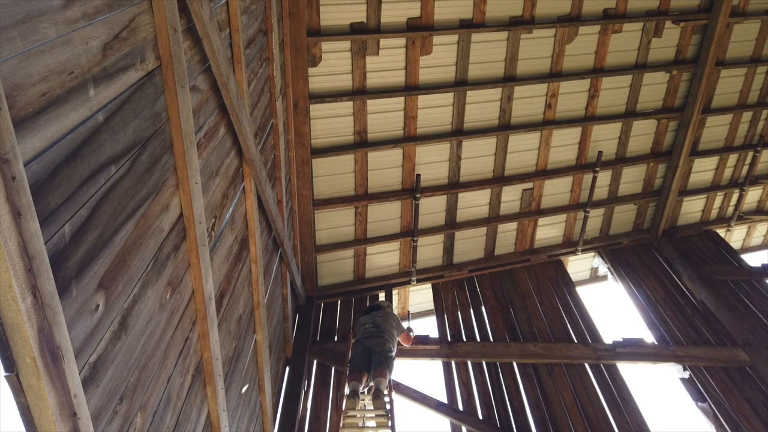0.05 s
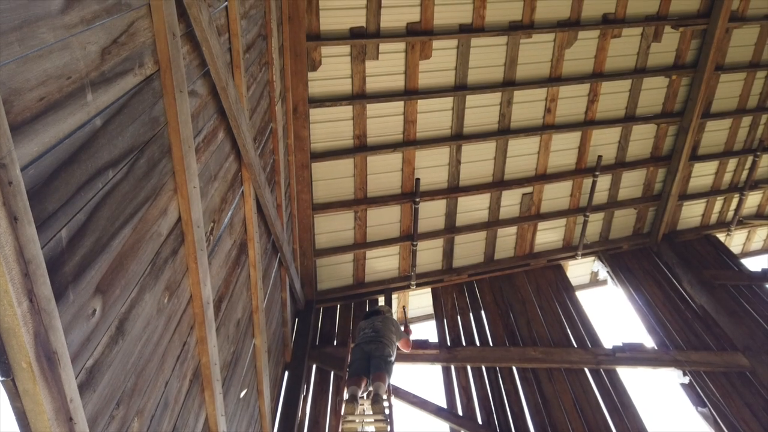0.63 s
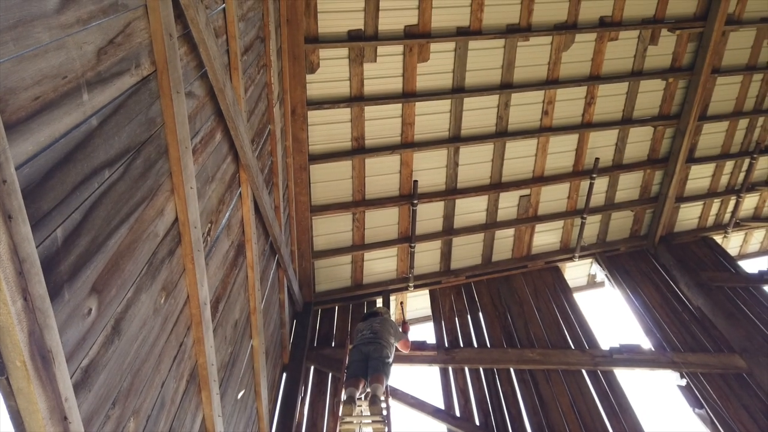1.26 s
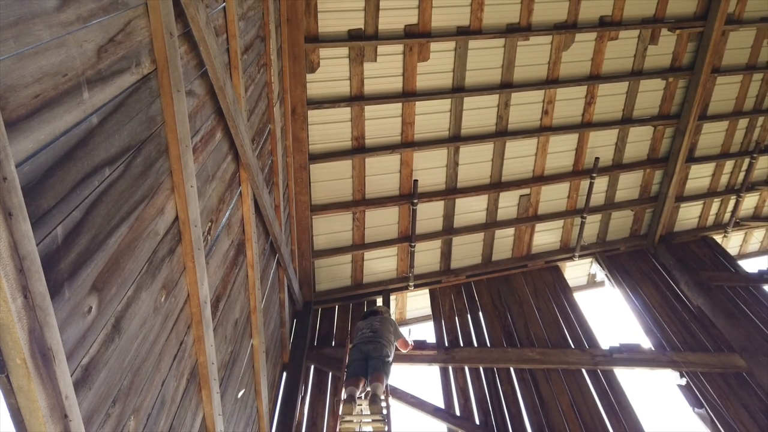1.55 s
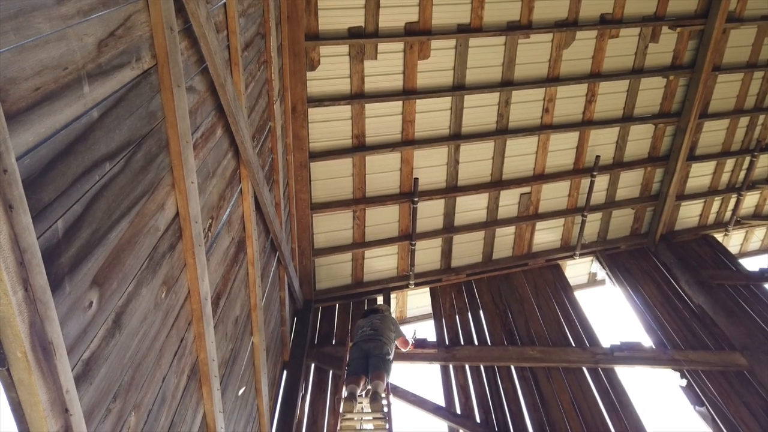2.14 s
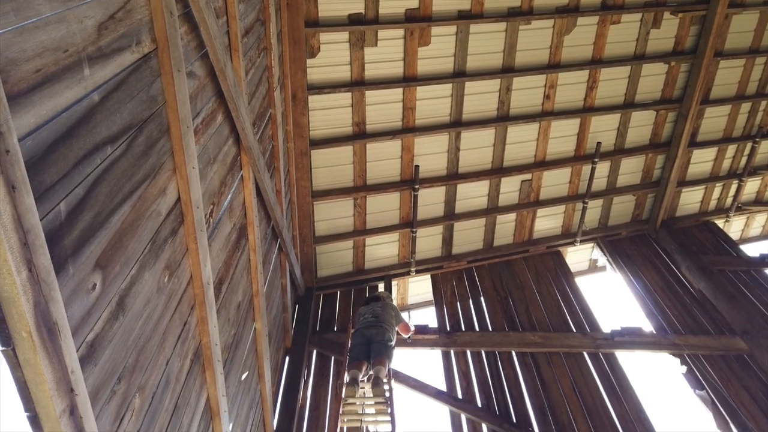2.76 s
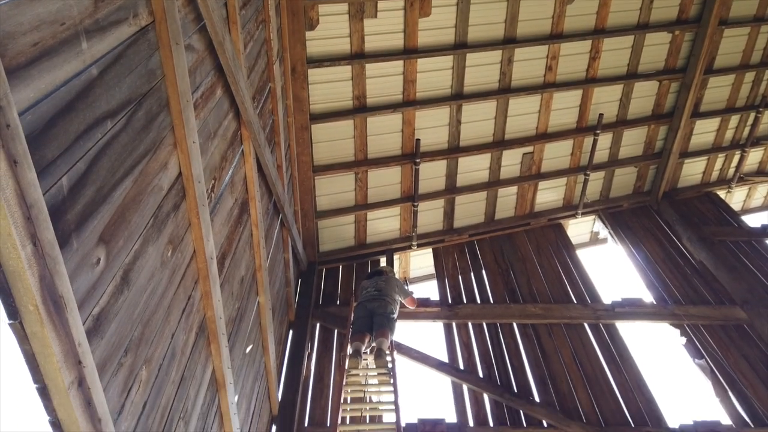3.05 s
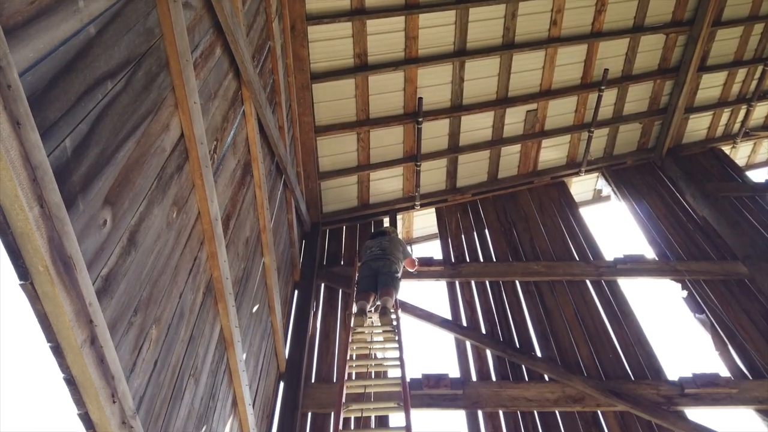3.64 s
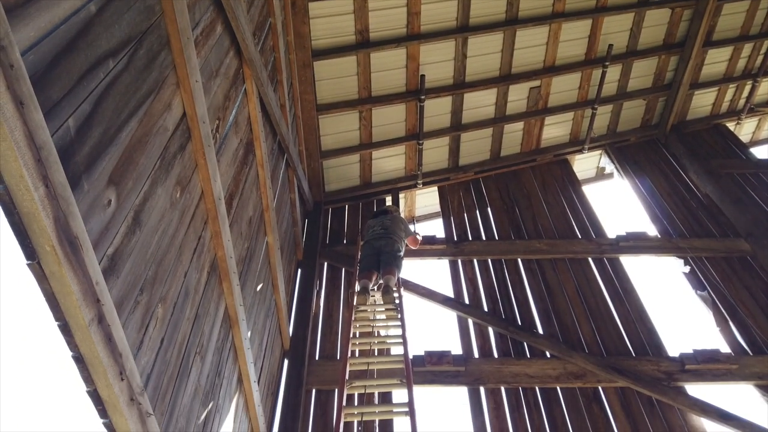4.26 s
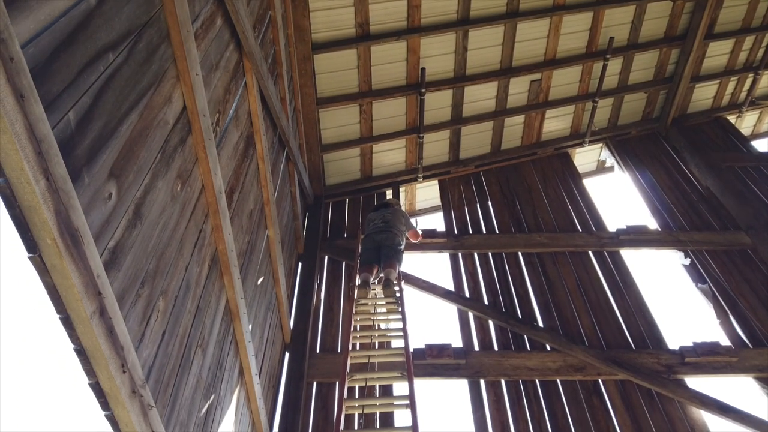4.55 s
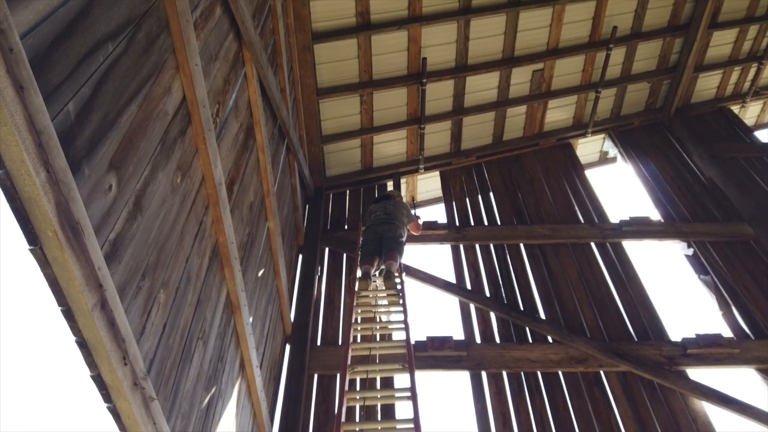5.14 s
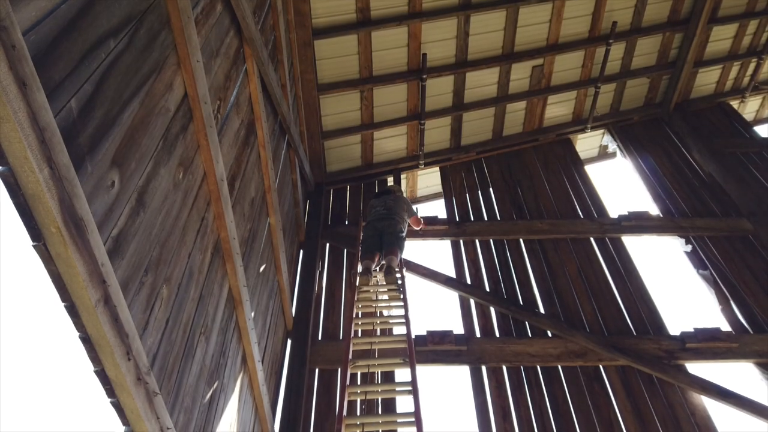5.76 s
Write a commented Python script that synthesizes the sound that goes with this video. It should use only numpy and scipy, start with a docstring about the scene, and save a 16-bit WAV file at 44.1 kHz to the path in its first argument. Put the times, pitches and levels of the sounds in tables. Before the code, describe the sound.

Two runs of ringing wooden knocks from someone climbing a ladder echo through a barn, with faint squeaks between.

```python
"""Wooden knocks from someone high on a tall ladder in a large timber barn: five knocks, a pause,
five quicker ones and the start of another. Each knock hits twice in quick succession, makes the same
woodwork ring and leaves a thin high ring behind. The plank walls and the roof throw the sound back.
In between come a few very faint thin squeaks and two soft bumps.
Under it all, a draught rumbles low and unevenly, with a little hiss."""
import sys
import numpy as np
from scipy import signal
from scipy.fft import rfft, irfft, next_fast_len
from scipy.io import wavfile
from scipy.ndimage import uniform_filter1d

SR = 44100
rng = np.random.default_rng(int(sys.argv[2]) if len(sys.argv) > 2 else 0)


def output_pcm(signal):
    """Save a mono or channel-first signal as 16-bit PCM at the path in sys.argv[1].

    Samples are clipped to [-1, 1] before scaling.
    """
    pcm = np.clip(np.atleast_2d(signal).T, -1, 1) * 32767
    wavfile.write(sys.argv[1], SR, np.round(pcm).astype(np.int16))


N = 264591
RING_SAMPLES = 49152  # room for one sound to die away

# one row per knock: (time [s], strength [dB], bass boost [dB], treble boost [dB], second hit delay [s],
# second hit level [dB], note of the struck spot [Hz], boost of that note [dB], high ring level [dB])
KNOCKS = [(0.0925, -4.5, 0.4, 4.5, 0.018, 2.5, 2060, 3, -58),
          (0.5748, -1.64, 2, 6, 0.0082, -2, 1700, 2, -68),
          (1.1077, -2.5, 1.5, 5.5, 0.0076, 0, 1610, 1.5, -60),
          (1.6699, 0.07, -1.2, 3.5, 0.025, -3.5, 1170, 2, -48),
          (2.28, 1.7, -7.5, 0.4, 0.021, 0, 1055, 4, -37), (3.8948, 5.5, -8, -6, .007, -8, 1676, 2, -47),
          (4.3085, 0.4, -0.3, -4, .015, 1, 3120, 4, -53), (4.7193, -4, -0.5, 4, .020, 2.5, 1210, -2, -44.5),
          (5.136, -3, -1, 3.5, .015, 3, 1100, -3, -44), (5.5592, -0.8, 0, 1, 0.013, 2, 645, -4, -44),
          (5.9968, -1.5, 8.5, 13.5, .015, 0, 1100, -11, -47)]
# notes at which the woodwork rings: (pitch [Hz], boost [dB])
WOOD_NOTES = [(88, 9), (113, 10.5), (132, 7), (166, 9), (205, 10), (236, 11.5), (293, 9.5), (368, 7.5),
              (414, -0.5), (457, 2.5), (506, 3), (600, 6.5), (622, 2), (707, 4.5), (837, -1.5), (899, 6),
              (990, 5.5), (1087, 6), (1122, 6.5), (1211, 7.5), (1313, 5), (1528, -1.5), (1625, 4.5),
              (1870, -2.5), (2010, 2), (2169, 7), (2387, 6), (2511, 5), (2831, 0), (3150, 2)]
# overall tone of a knock: (frequency [Hz], level [dB])
KNOCK_TONE = [(30, -21), (70, 0), (100, 4.5), (200, 2.5), (400, 0), (620, -0.5), (1100, -4.5), (1700, -4),
              (2600, -12), (3200, -11.5), (3700, -17), (6500, -20), (9000, -27), (11000, -25.5),
              (15500, -41)]
# how closely each knock follows the usual paths through the barn: (frequency [Hz], likeness [0 to 1])
PATH_LIKENESS = [(100, 0.87), (600, 0.99), (2000, 1), (5000, 0.29), (12000, 0.5)]
# notes of the thin high ring: (pitch [Hz], level [dB], time to fade by 60 dB [s])
HIGH_NOTES = [(2780, -3, .5), (2980, -1, .6), (3150, 0, .38), (3310, -2, .38), (4200, -9, .45),
              (4700, -4, .58), (5450, -11, .5)]
# the barn's echo, band by band: (frequency [Hz], time to fade by 60 dB [s], build-up time [s],
# early echoes compared with the tail [dB], direct sound compared with the tail [dB])
BARN_BANDS = [(51.3, 0.65, 0.027, -13, -9), (103, 1.07, 0.046, 3, 3), (214, 0.71, 0.0091, 6, 3),
              (450, 0.53, 0.01, 4.5, 8), (1058, 0.5, 0.016, 11, 10.5), (2530, 0.43, 0.012, -1, -0.5),
              (5000, 0.39, 0.018, 1.5, 4), (9300, 0.26, 0.024, -4, -4), (15000, 0.29, 0.0095, -6, 8)]
# how alike left and right sound: (frequency [Hz], likeness [0 to 1])
STEREO_LIKENESS = [(25, 0.62), (60, 0.46), (125, 0.97), (300, 0.99), (650, 0.96), (1200, 0.89), (1900, 0.9),
                   (2300, 0.34), (3000, 0.6), (4200, 0.21), (5200, 0), (16000, 0.096)]
# faint squeaks: (middle time [s], length [s], pitch [Hz], level [dB])
SQUEAKS = [(1.06, .15, 1750, -69), (2.03, .25, 1750, -64), (2.88, .14, 2260, -77), (3.16, .16, 1745, -66),
           (3.24, .3, 2780, -73), (3.42, .22, 990, -72), (3.44, .26, 1725, -61), (3.71, .14, 2760, -76),
           (3.72, .16, 1745, -75), (3.75, .1, 990, -73), (3.86, .14, 1745, -63)]
# soft bumps: (middle time [s], rough length [s], level [dB])
BUMPS = [(2.102, 0.22, -41.5), (3.437, .17, -34.5)]
# tone of the bumps: (frequency [Hz], level [dB])
BUMP_TONE = [(15, -8), (35, 0.5), (75, 2), (130, -10), (220, -14.5), (450, -35.5), (900, -51),
             (3000, -81.5)]
# how the draught swells and sinks: (time [s], relative level [dB])
DRAUGHT_LEVELS = [(0.0, -35.5), (0.57, -45.5), (0.75, -37), (0.92, -46), (2.57, -38), (2.89, -51.5),
                  (3.81, -46), (3.91, -43.5), (4.36, -50), (4.5, -41), (5.46, -40), (6.0, -42.5)]
# tone of the draught's rumble: (frequency [Hz], level [dB])
RUMBLE_TONE = [(10, -12), (25, 1), (45, -3), (80, -2.5), (120, -10), (200, -21), (300, -28), (450, -39.5),
               (800, -50), (2000, -52), (6000, -93)]
# how loud the hiss is: (time [s], level [dB])
HISS_LEVELS = [(0, -65.5), (2.9, -75), (3.7, -70), (6, -64.5)]
# tone of the hiss: (frequency [Hz], level [dB])
HISS_TONE = [(100, -16), (700, 2.5), (1500, 5.5), (2500, -0.5), (4500, -8), (6600, -11.5), (7400, -12.5),
             (8200, -1), (9200, -10.5), (12500, -10.5), (16000, -52)]


def knocks(level_db=23.5, bass_hz=250, treble_hz=4000, thin_below_hz=350, spot_width=0.39, ripple_db=2.2):
    """Each knock lands, then meets the wood a second time without the weight, so with less bass."""
    hz = np.fft.rfftfreq(RING_SAMPLES, 1 / SR) + 1
    wood_db = woodwork(hz)
    likeness = np.clip(curve_at(PATH_LIKENESS, hz), 0, 1)
    usual_paths = stereo_noise(RING_SAMPLES)
    bass = 1 / (1 + (hz / bass_hz) ** 2)
    treble = 1 / (1 + (treble_hz / hz) ** 2)
    thin_db = -10 * np.log10(1 + (thin_below_hz / hz) ** 2)
    out = np.zeros((2, N))
    for start, db, bass_db, treble_db, delay, second_db, spot_hz, spot_db, ring_db in KNOCKS:
        force_db = level_db + db + bass_db * bass + treble_db * treble
        spot_note_db = spot_db * peak(hz, spot_hz, spot_width * spot_hz)
        tone_db = force_db + wood_db + ripple_db * wood_ripple(hz) + spot_note_db
        # the struck spot barely moves, so low sounds take nearly the same paths every time
        paths = likeness * usual_paths + np.sqrt(1 - likeness ** 2) * stereo_noise(RING_SAMPLES)
        first_hit = shape_tone(barn(paths), tone_db)
        second_hit = shape_tone(barn(stereo_noise(RING_SAMPLES)), tone_db + second_db + thin_db)
        add(out, start, first_hit)
        add(out, start + delay, second_hit)
        add(out, start, amp(ring_db) * high_ring())
    return out


def woodwork(hz):
    """Tone of the struck wood in dB: it boosts its own notes, and higher notes make wider peaks."""
    peaks = sum((amp(db) ** 2 - 1) * peak(hz, pitch, width=13 + .026 * pitch) for pitch, db in WOOD_NOTES)
    return curve_at(KNOCK_TONE, hz) + 10 * np.log10(np.maximum(1 + peaks, .1))


def wood_ripple(hz):
    """Random peaks and dips in the tone: the wood's many small high notes, which no two knocks ring alike."""
    pitches = np.geomspace(500, 17000, num=150)
    heights = unit_level(rng.standard_normal(len(pitches))) * np.minimum(pitches / 2000, 1)
    return np.interp(hz, pitches, heights) * (hz > pitches[0])


def high_ring(width_hz=170, rise_s=0.0092):
    """The thin ring after a knock: high notes fade, each blurred by its many paths through the barn."""
    t = np.arange(RING_SAMPLES) / SR
    hz = np.fft.rfftfreq(RING_SAMPLES, 1 / SR)
    paths = stereo_noise(RING_SAMPLES)
    out = np.zeros((2, RING_SAMPLES))
    for pitch, db, fade_s in HIGH_NOTES:
        note = unit_level(irfft(paths * peak(hz, pitch, width_hz)))
        out += amp(db) * note * fade(t, fade_s)
    return out * (1 - np.exp(-t / rise_s))


def barn(paths, direct_s=.0075, rise_s=.0022, early_s=.037,
         echo_s=0.0543, echo_width_s=0.0056, echo_db=13, echo_top_hz=130):
    """One hit in the barn: the direct sound, a burst of early echoes, one low echo and a fading tail."""
    t = np.arange(RING_SAMPLES) / SR
    hz = np.fft.rfftfreq(RING_SAMPLES, 1 / SR)
    centres = np.transpose(BARN_BANDS)[0]
    out = np.zeros((2, RING_SAMPLES))
    for centre, fade_s, build_s, early_db, direct_db in BARN_BANDS:
        band = curve_at(np.column_stack([centres, centres == centre]), hz)  # 1 here, 0 at the other bands
        direct = amp(direct_db) * np.exp(-(t / direct_s) ** 2) * (1 - np.exp(-t / rise_s))
        early = amp(early_db) * np.exp(-(t / early_s) ** 4)
        echo_gain = amp(echo_db) / (1 + (centre / echo_top_hz) ** 2)
        low_echo = echo_gain * np.exp(-((t - echo_s) / echo_width_s) ** 2)
        reflections = np.hypot(early, fade(t, fade_s)) * (1 - np.exp(-t / build_s))
        out += (direct + low_echo + reflections) * irfft(paths * band)
    # even out the tone, so that the barn only spreads the hit in time
    power = uniform_filter1d((abs(rfft(out)) ** 2).mean(0), size=29)
    return shape_tone(out, -10 * np.log10(abs(power) + 1e-9))


def squeaks(bend=0.034, waver=0.0084, flutter_db=3, tail_db=-2, fade_s=0.72):
    """Thin tones that swell, flutter, rise and fall in pitch and fade, blurred by the barn."""
    out = np.zeros((2, N))
    for middle, length, hz, db in SQUEAKS:
        progress = np.linspace(-1, 1, round(length * SR))
        slow_noise = unit_level(uniform_filter1d(rng.standard_normal((2, SR)), size=500))
        wobble, flutter = slow_noise[:, :len(progress)]
        pitch = hz * (1 - bend * progress ** 2 + waver * wobble)
        loudness = np.cos(np.pi * progress / 2) ** 2 * amp(db + flutter_db * flutter)
        tone = loudness * np.sin(2 * np.pi * np.cumsum(pitch) / SR)
        add(out, middle - length / 2, np.array([tone, tone]))
    tail = irfft(stereo_noise(RING_SAMPLES)) * fade(np.arange(RING_SAMPLES) / SR, fade_s)
    echoes = signal.fftconvolve(out, tail / np.linalg.norm(tail[0]), axes=1)[:, :N]
    return out + amp(tail_db) * echoes


def bumps():
    """Soft low bumps: deep noise that swells and fades without a click."""
    t = np.arange(N) / SR
    loudness = sum(amp(db) * np.exp(-(2 * (t - middle) / length) ** 2) for middle, length, db in BUMPS)
    return loudness * steady_noise(BUMP_TONE)


def air(rumble_db=2, lumps_db=2, lumps_per_s=5):
    """A draught rumbles, swelling and sinking in uneven lumps, under a faint hiss."""
    t = np.arange(N) / SR
    swell_db = np.interp(t, *np.transpose(DRAUGHT_LEVELS))
    hiss_db = np.interp(t, *np.transpose(HISS_LEVELS))
    lumps = np.interp(t * lumps_per_s, np.arange(256), rng.standard_normal(256))
    rumble = amp(rumble_db + swell_db + lumps_db * lumps) * steady_noise(RUMBLE_TONE)
    return rumble + amp(hiss_db) * steady_noise(HISS_TONE)


def steady_noise(tone):
    """Stereo noise with the given tone and an average level of 1, as long as the scene."""
    size = 2 * next_fast_len(N // 2 + 1)
    gain = amp(curve_at(tone, np.fft.rfftfreq(size, 1 / SR)))
    return unit_level(irfft(stereo_noise(size) * gain)[:, :N])


def stereo_noise(size):
    """Spectrum of white noise, left and right: mostly alike low down, unrelated in the treble."""
    likeness = np.clip(curve_at(STEREO_LIKENESS, np.fft.rfftfreq(size, 1 / SR)), -1, 1)
    mid, side = rfft(rng.standard_normal((2, size)))
    mid *= np.sqrt((1 + likeness) / 2)
    side *= np.sqrt((1 - likeness) / 2)
    return np.array([mid + side, mid - side])


def shape_tone(sound, db):
    """Turns each frequency up or down by its dB value, with no ringing ahead of the sound."""
    log_gain = np.log(amp(np.concatenate([db, db[-2:0:-1]])))
    response = np.exp(np.conj(signal.hilbert(log_gain)))[:len(db)]
    return irfft(rfft(sound) * response)


def peak(hz, centre, width):
    """The hill that a ringing note makes in the spectrum, 1 at its centre."""
    return 1 / (1 + (2 * (hz - centre) / width) ** 2) ** 2


def curve_at(points, hz):
    """Looks up values between (frequency, value) points, giving each octave about equal room."""
    frequencies, values = np.transpose(points)
    return np.interp(np.log(hz + 1), np.log(frequencies + 1), values)


def fade(t, fade_s):
    """A level that falls by 60 dB every fade_s seconds."""
    return np.exp(-np.log(1000) * t / fade_s)


def amp(db):
    """Turns decibels into a number to multiply by."""
    return 10 ** (np.asarray(db) / 20)


def unit_level(x):
    """Scales a signal to an average (rms) level of 1."""
    return x / np.sqrt(np.mean(x ** 2) + 1e-20)


def add(mix, start_s, sound):
    """Adds a stereo sound to the mix at the given time."""
    part = mix[:, round(start_s * SR):][:, :sound.shape[1]]
    part += sound[:, :part.shape[1]]


def scene():
    """Knocks, squeaks and soft bumps over the air of the barn."""
    return knocks() + squeaks() + bumps() + air()


def record(dry, top_hz=16000):
    """Cuts away the very highest treble."""
    low_pass = signal.firwin(511, top_hz, window=("kaiser", 9), fs=SR)
    return signal.oaconvolve(dry, low_pass[None], "same")


dry = scene()
out = record(dry)
output_pcm(out)
```